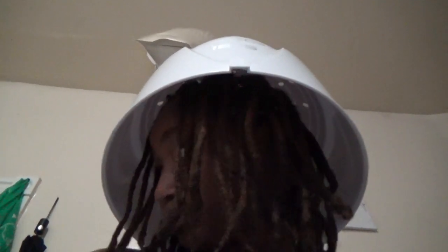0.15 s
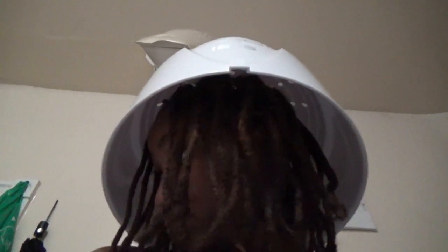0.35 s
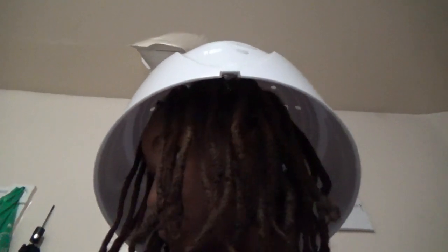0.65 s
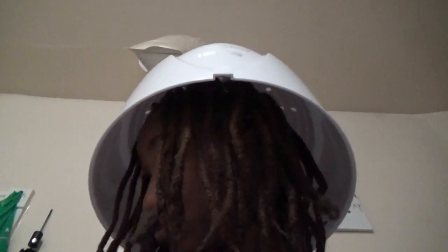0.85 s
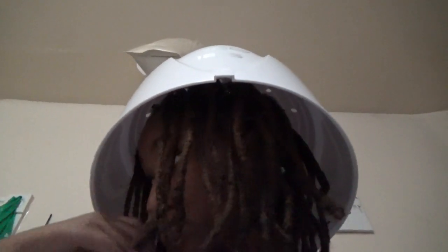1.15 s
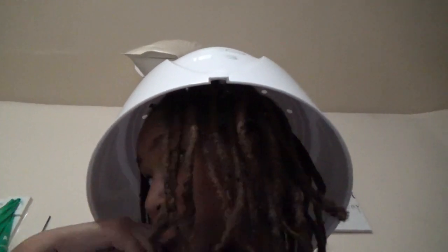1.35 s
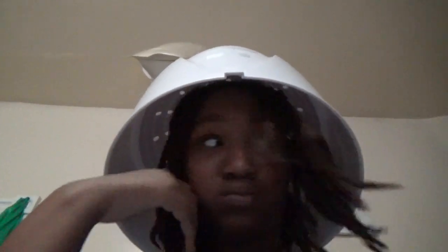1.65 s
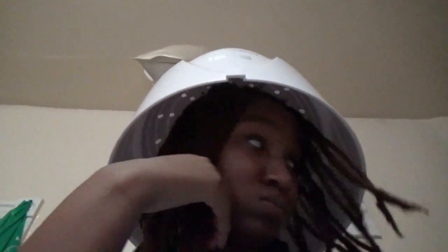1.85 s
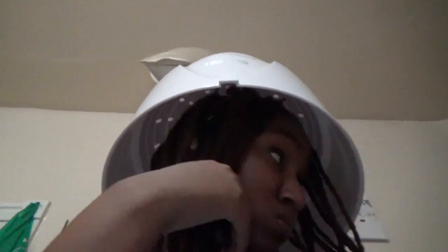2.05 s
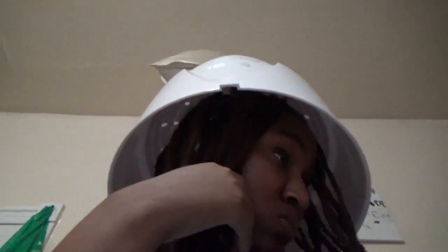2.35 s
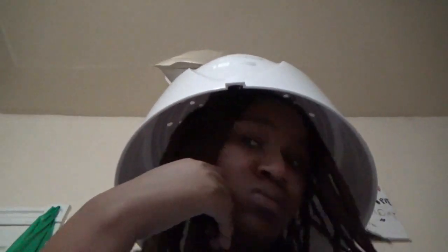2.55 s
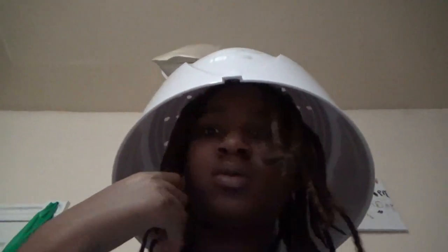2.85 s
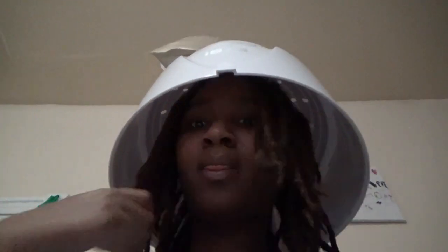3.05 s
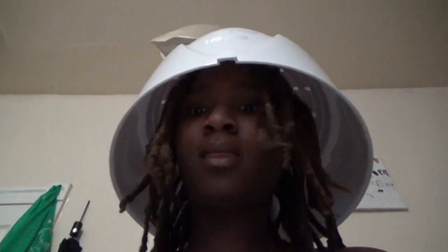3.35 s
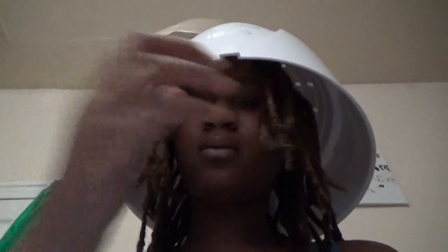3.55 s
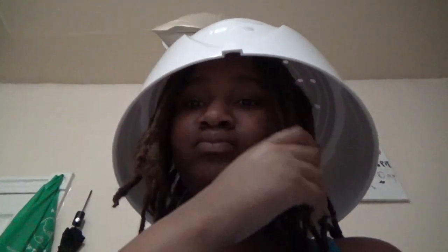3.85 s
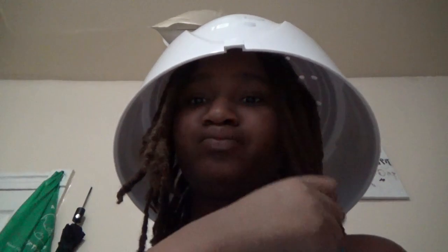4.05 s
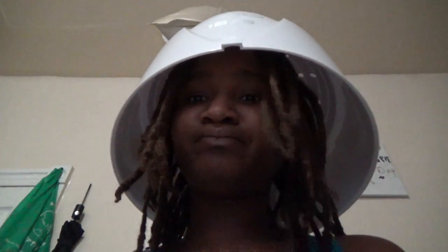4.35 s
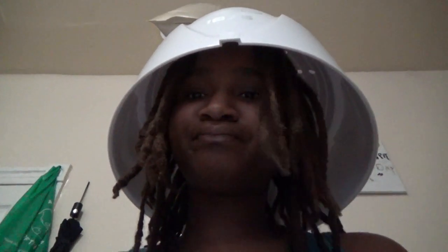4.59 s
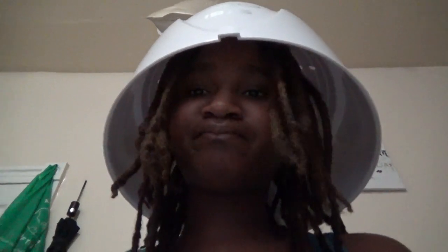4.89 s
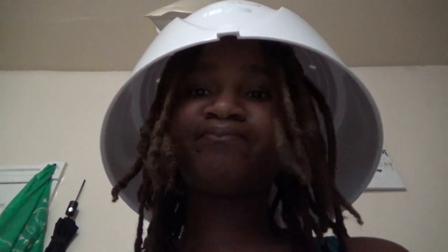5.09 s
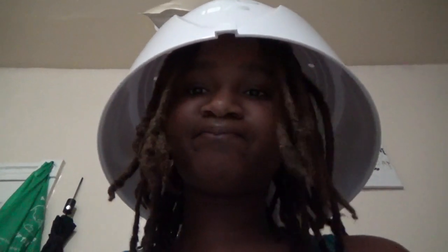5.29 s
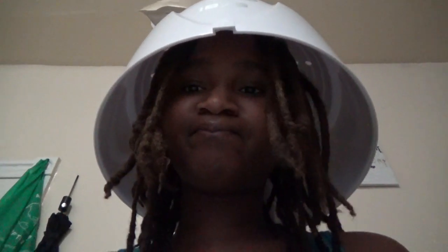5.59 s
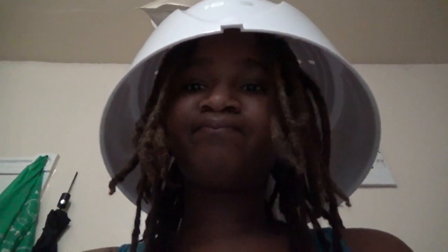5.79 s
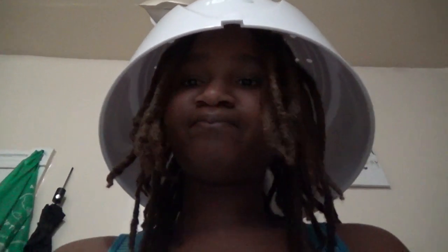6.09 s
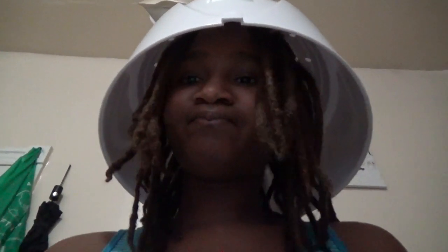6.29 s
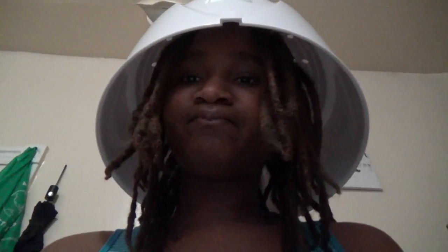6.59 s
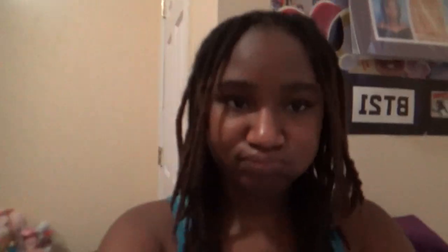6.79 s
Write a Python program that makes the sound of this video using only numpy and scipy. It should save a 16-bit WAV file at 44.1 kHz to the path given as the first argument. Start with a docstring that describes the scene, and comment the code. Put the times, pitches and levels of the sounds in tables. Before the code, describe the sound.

From 0 s a hooded hair dryer is already running close to a small stereo microphone in a small room. A dense, steady rush of air hisses widely, with hollow, tube-like resonances from hood and duct, over a firm, constant motor hum around 275 Hz. A thin whine near 1100 Hz sings out at the start, from about 1.5 to 2.1 s, again around 2.4 to 3.7 s, and from 4.9 s on. The colour changes gently as the head turns, growing a little brighter and more open after 3 s. A faint tap is nearly buried at 4.8 s. Low hollow tones swell slightly around 6 s. From 6.4 to 6.6 s a few short, plasticky button clicks land mostly on the left. At 6.69 s the dryer vanishes abruptly, without winding down, leaving soft, dull room noise and one barely audible tick at about 6.84 s.

```python
"""A hooded hair dryer runs in a small room, close to a pair of microphone ports.
The motor whines at multiples of its shaft rate; blown air rings the hollows of hood and duct as narrow
noise bands, and its broad hiss bounces off near surfaces. A head moving in the hood shifts the colour.
Faint hums lie below. Small taps, as of a button on a laptop or phone, ring its case; the dryer's sound
is cut off and a quiet room follows."""
import sys
import numpy as np
from scipy import signal
from scipy.fft import rfft, irfft
from scipy.io import wavfile
from scipy.ndimage import uniform_filter1d

SR = 44100
rng = np.random.default_rng(int(sys.argv[2]) if len(sys.argv) > 2 else 0)


def waveform_to_disk(signal):
    """Save audio, clipped to [-1, 1], as 16-bit WAV at the path in sys.argv[1]."""
    frames = np.transpose(np.atleast_2d(signal))
    scaled = np.clip(frames, -1, 1) * 32767
    samples = np.round(scaled).astype(np.int16)
    wavfile.write(sys.argv[1], SR, samples)


N = 305613

# Quiet room, noise density: pitch_hz, relative level_db (per Hz)
ROOM_COLOUR = [(18, -38), (30, -8), (163, -6), (320, -8), (394, -12), (597, -7), (645, -9), (2130, -20),
               (3880, -22), (13900, -27), (15000, -23)]
# Room noise that differs between the ports: pitch_hz, side_minus_mid_db
ROOM_SIDE = [(30, -20), (700, 1), (7000, -7), (10500, -12), (11500, -30), (16000, -30)]
# Small taps, as of a button on a laptop or phone: start_s, peak level_db at the left port
TAPS = [(4.78, -24), (6.4035, -18), (6.418, -10), (6.498, -19), (6.594, -15), (6.836, -52)]
# Ringing modes of the tapped case: pitch_hz, relative level_db, t60_s
CASE_MODES = [(1130, 0, .04), (1500, -3, .022), (1850, 1, .018), (2900, -7, .012), (3600, -9, .01)]
# Broad rush of air, noise density: pitch_hz, relative level_db (per Hz)
RUSH_COLOUR = [(25, -33), (60, -26), (110, -18), (160, -9), (200, 9), (450, 4.5), (900, 7), (1750, -2),
               (2600, -0.5), (3400, -5.5), (4000, -4.5), (7000, -8.5), (9000, -3.5), (11000, -8),
               (15600, -25.5)]
# Rush that differs between the ports: pitch_hz, side_minus_mid_db
RUSH_SIDE = [(30, -1), (110, 11), (200, -10.5), (1800, -6), (3500, -8.5), (7000, -13), (9500, -14.5),
             (11000, -43), (16000, -45)]
# Echoes off head, shoulders and wall: delay_s, level_db, sway_s
BOUNCES = [(.0011, -17, .00006), (.0023, -16, .00007), (.0047, -15, .00007), (.0083, -15, .00008)]
# Slow sag of the topmost hiss: start_s, end_s, change_db, ramp_s
SHEEN_DIP = [(2.9, 4.6, -1.7, 0.35)]
# Resonances of hood and duct, by group: pitch_hz, width_hz, relative level_db at the top (per Hz),
# facing_db gained when the head faces the ports
LOW_HOLLOWS = [(191.6, 23.6, -7, 1.5), (267.4, 68, -0.5, -1.5), (352.6, 19, -7.5, -3), (680, 100, -0.5, 2),
               (780, 160, -10, 1)]
MIDDLE_HOLLOWS = [(932, 70, 2.5, 1.5), (1030, 91, 2, -2.5), (1234, 190, 3, 1.5), (1376, 87, -1, 5.5),
                  (1568, 126, -1, 5.5)]
HIGH_HOLLOWS = [(1940, 66, -7.5, 0), (2113, 100, -5, 4), (2381, 166, -2.5, 7), (2564, 99, -2, 4)]
RIM_HOLLOWS = [(2803, 177, 1, 0.25), (2938, 127, 5.5, 0.32), (3040, 120, -0.5, 1)]
TOP_HOLLOWS = [(3300, 120, -16, 22), (3480, 70, 0, 8), (3870, 99, -0.5, 4), (4403, 160, 4, -8),
               (5200, 190, 0, 5), (5420, 46, 2.5, 5), (6010, 140, 3.5, 0.5), (6990, 60, 4, 0),
               (7100, 100, -6, -2), (7980, 330, 4, -0.5)]
# Late swell of the low hollows: start_s, end_s, change_db, ramp_s
LOW_SWELL = [(5.9, 6.45, 2.5, 0.18)]
# Fades of the rim resonances: start_s, end_s, change_db, ramp_s
RIM_DIPS = [(2.0, 2.5, -2.5, 0.22), (3.6, 5.2, -2, 0.45), (4.6, 5.95, -7, .5)]
# Head in the hood: time_s, facing (0 turned aside, 1 upright and facing the ports)
HEAD = [(0, 0.2), (2.4, 0.038), (3.2, .55), (4.2, 0.63), (5.7, 1), (6.68, 0.88)]
# Strong multiples of the shaft rate: multiple, rms level_db with the head aside, facing_db gained
WHINE_LINES = [(1, -23.5, .3), (2, -40.5, 3), (3, -30.5, 1), (4, -46, 2.5), (6, -47.5, 4.5)]
# Weaker multiples, untouched by the head: multiple, rms level_db
UPPER_LINES = [(5, -48), (8, -50), (12, -58), (15, -60), (16, -59), (17, -62), (19, -60), (22, -64),
               (25, -65), (26, -65), (32, -64), (35, -62), (38, -61)]
# The fourth multiple sings out: start_s, end_s, rise_db
SINGING = [(-.1, .7, 7.5), (1.48, 2.103, 13.5), (2.384, 3.21, 11.5), (2.998, 3.7, 7), (4.9, 7, 5)]
# Phase lead of the left port over the right for near sound: pitch_hz, lead_rad
PORT_PHASE = [(0, 0), (260, 0.71), (690, 0.65), (1120, 0), (1720, 0.74), (2150, 0), (3010, 0.43),
              (3270, 0.38), (3620, 0.3), (5430, 0), (7240, 0.84), (10700, 0.0), (15200, -0.0)]
# Tilt between the ports for near sound: pitch_hz, left_minus_right_db
PORT_BALANCE = [(60, 0.0), (110, -1), (200, 3.5), (380, -4.5), (700, -1.5), (1290, -5), (2380, -2.5),
                (4400, -2.5), (8120, 0.0), (15000, -4)]

ROOM_DB, ROOM_RISE_S = -59.5, .022  # rms level of the room; time for a full rise from silence
CUT_S, CUT_FADE_S = 6.690, .011  # the dryer's sound is gone at CUT_S, after this fade
MAINS_HZ, MAINS_DB = 119.6, -62  # rms level before its slow waver
DRONE_HZ, DRONE_DB, DRONE_END_S, DRONE_RAMP_S = 69.5, -57.5, .7, 0.22
SHEEN_HZ, SHEEN_FACING_DB = 7450, 1  # the topmost hiss and its gain when the head faces the ports
HISS_DB = -29.5  # rms level of the rush once settled
OPENING_DB, OPENING_S = -2.5, .2  # the rush starts a little low and settles
# base rms level of each group of hollows (dB)
LOW_DB, MIDDLE_DB, HIGH_DB, RIM_DB, TOP_DB = -29, -33.5, -35, -34, -42
SHAFT_HZ, SINGING_RAMP_S = 275.62, 0.18
BASS_CUT_HZ, TOP_HZ = 37, 15760


def undb(db):
    """Turn dB into gain."""
    return 10 ** (np.asarray(db) / 20)


def level(x, db):
    """Scale to an rms level in dB."""
    return x * undb(db) / np.sqrt(np.mean(x ** 2))


def bins():
    """Frequency of every spectrum bin in Hz, kept just above zero."""
    return np.arange(N // 2 + 1) * SR / N + 1e-3


def along(table):
    """Read a (pitch_hz, value) table at every bin, along log frequency."""
    hz, value = np.transpose(table)
    return np.interp(np.log(bins()), np.log(np.maximum(hz, 1)), value)


def curves(table):
    """Read each column of a timed table at every sample."""
    s, *columns = np.transpose(table)
    return [np.interp(np.arange(N) / SR, s, column) for column in columns]


def spell(start, end, ramp):
    """Rise from 0 to 1 and return between two moments, with smooth ramps."""
    t = np.arange(N) / SR
    return np.sin(np.pi / 2 * np.clip(np.minimum(t - start, end - t) / ramp, 0, 1)) ** 2


def spells(rows):
    """Sum the dB changes of (start_s, end_s, change_db, ramp_s) rows."""
    return sum(db * spell(start, end, ramp) for start, end, db, ramp in rows)


def walk(rate):
    """Wander randomly: levels held 1 / rate s and smoothed twice, with a spread near 1."""
    hold = int(SR / rate)
    steps = np.repeat(rng.standard_normal(N // hold + 1), hold)
    return 1.43 * uniform_filter1d(uniform_filter1d(steps, hold), hold)[:N]


def noise(gain):
    """Colour white noise by a gain per bin."""
    return irfft(gain * rfft(rng.standard_normal(N)), N)


def spread(gain, side_gain):
    """Sound from all round: a common part plus a part opposite at the two ports."""
    return noise(gain) + noise(gain * side_gain) * np.array([[1], [-1]])


def ports(x):
    """A near source reaches the two ports with a lead and a tilt that depend on pitch."""
    half = undb(along(PORT_BALANCE) / 2) * np.exp(.5j * along(PORT_PHASE))
    return irfft(rfft(x) * np.array([half, 1 / half]), N)


def quiet_room():
    """Coloured noise from all round, its level flickering slightly."""
    room = level(spread(undb(along(ROOM_COLOUR)), undb(along(ROOM_SIDE))), ROOM_DB)
    return undb(1.2 * walk(30)) * room


def taps():
    """Soft taps, as of a button on a laptop or phone, ring its case and push the ports unequally."""
    out, t = np.zeros((2, N)), np.arange(2000) / SR
    for s, db in TAPS:
        knock = 0
        for hz, mode_db, t60 in CASE_MODES:
            ring = np.sin(2 * np.pi * (hz * t + rng.random()))
            knock = knock + undb(mode_db) * ring * undb(-60 * t / t60)
        knock = knock * (1 - np.exp(-t / .001))  # soft onset
        knock = undb(db) * knock / np.abs(knock).max()
        start = int(s * SR)
        out[:, start:start + len(t)] += knock * np.array([[1], [-.2]])  # left, right
    return out


def hums():
    """Mains hum of the heater as a wavering sine, and a low drone that rises and soon dies."""
    t = np.arange(N) / SR
    mains = undb(MAINS_DB + 2 * walk(3.25)) * np.sin(2 * np.pi * MAINS_HZ * t)
    drone_gain = undb(DRONE_DB) * spell(-0.084, DRONE_END_S, DRONE_RAMP_S)
    drone = drone_gain * np.sin(2 * np.pi * DRONE_HZ * t + .5 * walk(4))
    return np.sqrt(2) * (mains + drone)


def bounced(x):
    """Echoes from near surfaces sway slowly, so the fine ripple of the hiss drifts."""
    i = np.arange(N)
    out = x
    for delay, db, sway in BOUNCES:
        late = i - SR * (delay + sway * walk(1.2))
        out = out + undb(db) * np.array([np.interp(late, i, channel) for channel in x])
    return out


def rush(head):
    """Blown air hisses from all round; its topmost part follows the head and flickers."""
    gain, side = undb(along(RUSH_COLOUR)), undb(along(RUSH_SIDE))
    top = 1 / (1 + (SHEEN_HZ / bins()) ** 8)  # share of power in the sheen
    body = spread(gain * np.sqrt(1 - top), side)
    sheen = spread(gain * np.sqrt(top), side)
    sheen_db = SHEEN_FACING_DB * head + spells(SHEEN_DIP) + .5 * walk(6)
    hiss = level(bounced(body + undb(sheen_db) * sheen), HISS_DB)
    opening_db = OPENING_DB * np.exp(-np.arange(N) / SR / OPENING_S)
    return undb(opening_db + 0.28 * walk(8)) * hiss


def ringing(modes, head):
    """Turbulence rings each steep resonance; each one wavers on its own and follows the head."""
    out = 0
    for hz, width, db, facing_db in modes:
        shape = 1 / (1 + (2 * (bins() - hz) / width) ** 2)
        out = out + undb(db + facing_db * head + 1.1 * walk(3)) * noise(shape)
    return level(out, 0)


def hollows(head):
    """Air rings the hollows of hood and duct in five groups, each at its own level."""
    low = undb(LOW_DB + spells(LOW_SWELL)) * ringing(LOW_HOLLOWS, head)
    middle = undb(MIDDLE_DB) * ringing(MIDDLE_HOLLOWS, head)
    high = undb(HIGH_DB) * ringing(HIGH_HOLLOWS, head)
    rim = undb(RIM_DB + spells(RIM_DIPS)) * ringing(RIM_HOLLOWS, head)
    top = undb(TOP_DB) * ringing(TOP_HOLLOWS, head)
    return low + middle + high + rim + top


def whine(head):
    """Multiples of the shaft rate; the rotor jitters a little and each line flutters in the air stream."""
    turn = 2 * np.pi * SHAFT_HZ * np.arange(N) / SR + 0.056 * walk(12)
    singing_db = np.max([db * spell(start, end, SINGING_RAMP_S) for start, end, db in SINGING], axis=0)
    lines = list(UPPER_LINES)
    for multiple, db, facing_db in WHINE_LINES:
        lines.append((multiple, db + facing_db * head + (multiple == 4) * singing_db))
    out = 0
    for multiple, db in lines:
        flutter_db = 0.35 * np.sqrt(multiple) * walk(15)
        tone = np.sin(multiple * turn + 2 * np.pi * rng.random())
        out = out + np.sqrt(2) * undb(db + flutter_db) * tone
    return out


def dryer():
    """Hollows, whine and hums reach the ports from the near hood; the rush comes from all round."""
    head = curves(HEAD)[0]
    return ports(hollows(head) + whine(head) + hums()) + rush(head)


def scene():
    """The dryer runs, with small taps; its sound is cut off and a quiet room follows."""
    t = np.arange(N) / SR
    running = np.sin(np.pi / 2 * np.clip((CUT_S - t) / CUT_FADE_S, 0, 1)) ** 2
    quiet = np.clip((t - CUT_S) / ROOM_RISE_S + .25, 0, 1)  # a quarter up at the cut
    return quiet * quiet_room() + taps() + running * dryer()


def record(dry):
    """The microphone loses the deep bass and the recorder cuts the top."""
    bass_cut = signal.butter(2, BASS_CUT_HZ, "highpass", fs=SR, output="sos")
    top_cut = signal.ellip(14, .3, 60, TOP_HZ, fs=SR, output="sos")  # ripple and stopband in dB
    return signal.sosfilt(top_cut, signal.sosfilt(bass_cut, dry))


dry = scene()
out = record(dry)
waveform_to_disk(out)
```